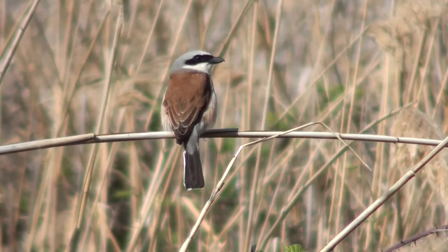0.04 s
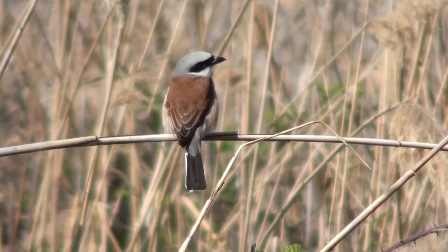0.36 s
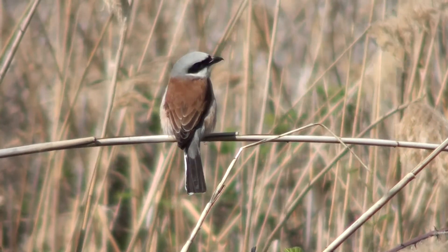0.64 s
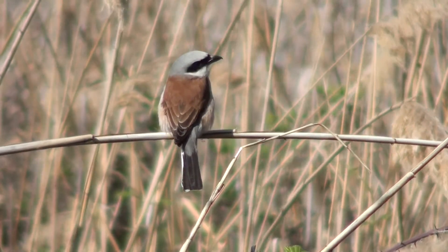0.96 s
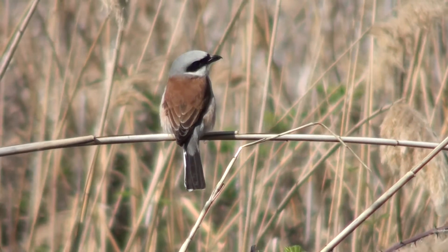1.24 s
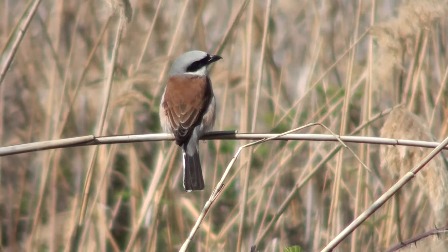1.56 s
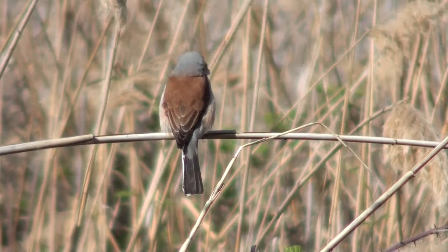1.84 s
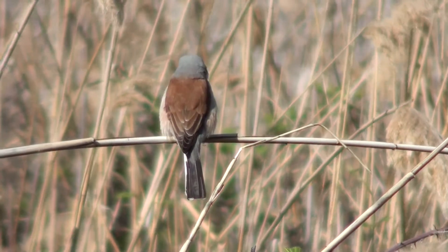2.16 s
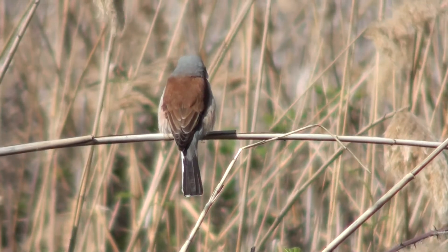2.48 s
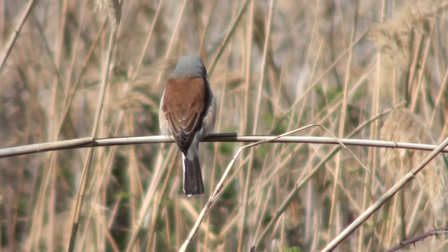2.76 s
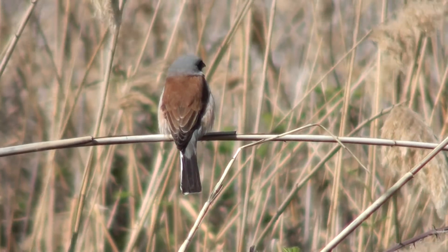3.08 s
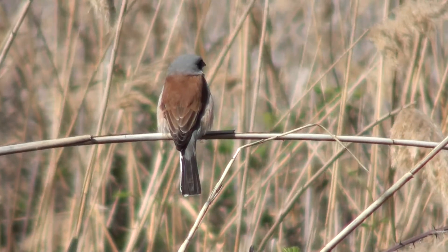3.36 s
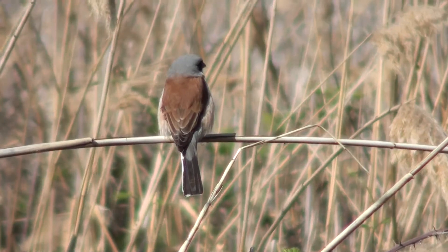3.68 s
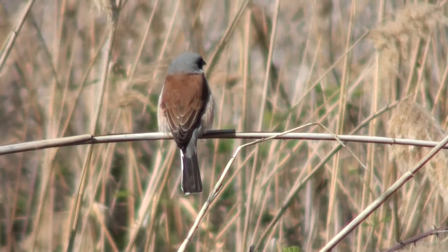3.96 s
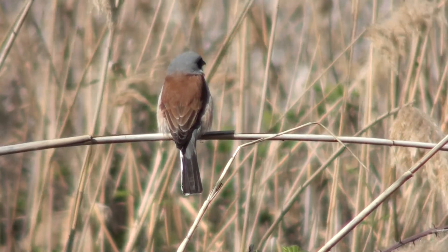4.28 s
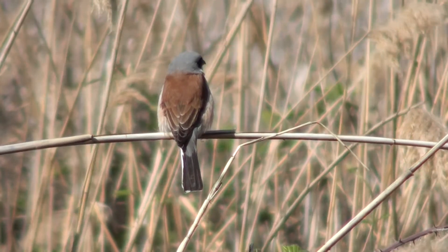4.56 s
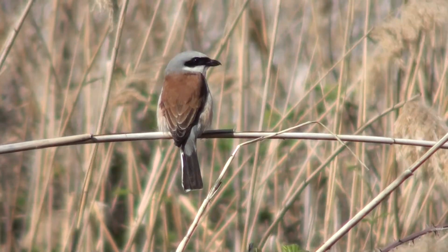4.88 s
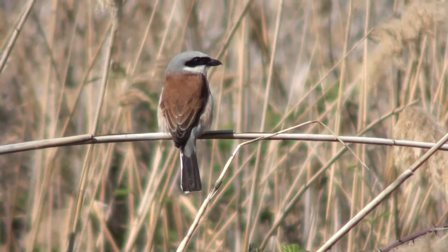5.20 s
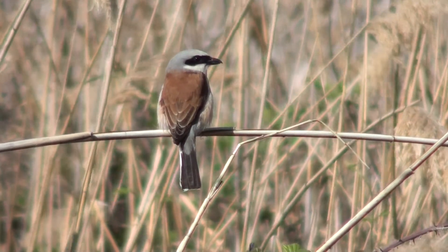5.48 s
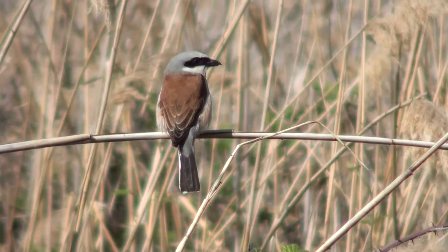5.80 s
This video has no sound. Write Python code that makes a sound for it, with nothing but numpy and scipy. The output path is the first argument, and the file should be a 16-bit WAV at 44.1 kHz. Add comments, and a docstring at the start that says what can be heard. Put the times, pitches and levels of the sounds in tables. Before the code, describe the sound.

Outdoors by calm reeds, over steady soft air and microphone hiss, a close warbler gives soft scratchy notes against distant rising chirps. Two clear whistles follow, then a louder run of stuttering rasps, then an even series of buzzy nasal cheeps, all a little to the left. Two soft knocks and a few dry stem ticks fall around the cheeps. Thin far whistles come and go, and two brief rasps finish.

```python
"""Small songbirds at the edge of a reedbed on a calm day, over quiet air and microphone hiss.
First a far bird sings low upslurs while a near warbler rasps softly, its syrinx flapping unevenly.
From 1.2 s come two long whistles and far hoarse calls; from 1.8 s, eight loud stuttering rasps.
A soft knock at 3.7 s precedes nine nasal cheeps, each a buzz plus a whistle; dry stems tick among them
and a second knock falls at 5.2 s. Two short rasps close. Slurs and thin whistles come and go."""
import sys
import numpy as np
from scipy import signal
from scipy.fft import rfft, irfft
from scipy.io import wavfile
from scipy.ndimage import uniform_filter1d, map_coordinates

SR = 44100
rng = np.random.default_rng(int(sys.argv[2]) if len(sys.argv) > 2 else 0)


def transcribe(u):
    """Save the signal u as a 16-bit wav file named by the first command-line argument.

    u: samples, shape (n,) or (channels, n), limited to [-1, 1]; the rate is SR.
    q: integer samples, one column per channel.
    """
    v = np.clip(np.atleast_2d(u).T, -1, 1)
    q = np.round(v * 32767).astype(np.int16)
    wavfile.write(sys.argv[1], SR, q)


N = 261954

# Warbler's rasping notes. Each row: time in seconds, time stretch factor, level in dB, rhythm name.
RASPS = [(.352, 0.97, -42, "soft"), (.517, 1.04, -41, "soft"), (.764, 1.06, -39.5, "soft"),
         (.934, 1, -42, "soft"), (1.828, 0.97, -37.5, "loud"), (2.033, 0.98, -36, "loud"),
         (2.311, 0.98, -35, "loud"), (2.510, 1.03, -35, "loud"), (2.780, 0.98, -35.5, "loud"),
         (2.996, .99, -36, "loud"), (3.275, 0.98, -36.5, "loud"), (3.485, 1.056, -36.5, "loud"),
         (5.626, 0.95, -40, "short"), (5.823, 0.96, -41, "short")]
# Bursts of each rhythm. Each row: offset in seconds, length in seconds, early pitch in Hz,
# late pitch in Hz, relative level in dB.
RHYTHM_BURSTS = { "soft": [(-.029, .015, 3100, 3290, -4.5), (0, 0.013, 2810, 2870, -3),
                 (.018, .0105, 2760, 2970, -2), (.032, 0.013, 2810, 2790, 0.5),
                 (.0465, .007, 2780, 2750, 1.5), (.056, 0.023, 2824, 2750, -0.5)],
                 "loud": [(-.025, .018, 2730, 3020, -11), (0, 0.024, 2560, 2800, 0),
                 (.023, 0.017, 3040, 3050, -1.5), (.047, .0158, 2680, 2770, -1),
                 (.0712, .0098, 2730, 2820, -1.5), (.0835, 0.028, 2703, 2650, 0)],
                 "short": [(0, .015, 2320, 2420, -0.5), (.022, 0.018, 2570, 3100, 1),
                 (.041, .021, 2930, 2580, 1)]}
# Cheeps. Each row: peak time in seconds, whistle pitch in Hz, sweep exponent, buzz fundamental in Hz,
# level in dB.
CHEEP_NOTES = [(3.808, 3600, 1.37, 1454, -36.5), (3.984, 3560, 1.3, 1478, -36),
               (4.162, 3640, .95, 1458, -35.5), (4.349, 3640, 1.4, 1475, -34),
               (4.538, 3610, 0.53, 1472, -35), (4.737, 3630, 0.7, 1504, -36),
               (4.943, 3630, 0.97, 1449, -36.5), (5.162, 3540, 1.27, 1438, -35.5),
               (5.369, 3490, 1.8, 1436, -36)]
# A cheep's whistle and buzz. Each row: offset from the peak in seconds, pitch ratio, gain in dB.
CHEEP_WHISTLE_CONTOUR = [(-.02, .88, -35), (-.011, .905, -7), (-.005, .945, -2), (0, 1.0, 0),
                         (.006, 1.04, -2), (.014, 1.045, -9), (.026, .985, -18), (.036, .97, -35)]
CHEEP_BUZZ_CONTOUR = [(-.045, 1.01, -22), (-.027, 1.0, -5), (-.016, .975, 1), (-.011, .93, -6),
                      (-.003, .97, -25), (.008, 1.02, -3), (.025, .998, 0), (.052, .978, -2),
                      (.063, .975, -9), (.074, .975, -24)]
# Buzz spectrum. Each row: harmonic number, gain in dB.
BUZZ_HARMONICS = [(2, -1.5), (3, 1.5), (4, -14.5), (5, -19), (6, -22)]
# Long whistles, one list per note. Each row: time in seconds, pitch in Hz, level in dB.
LONG_WHISTLE_CONTOURS = [
    [(1.219, 2960, -44), (1.225, 3030, -37), (1.231, 3280, -41), (1.241, 3190, -37), (1.269, 3000, -38.5),
     (1.341, 2890, -40.5), (1.352, 2902, -58)],
    [(1.498, 3290, -31), (1.508, 3110, -35), (1.624, 2969, -39.5), (1.638, 2871, -40.5), (1.648, 2660, -60)],
]
# Warbler's direction. Each row: frequency in Hz, left minus right in dB.
WARBLER_PAN = [(1500, 3), (2400, 3.9), (3100, 4.0), (3700, 2.6), (4400, .5), (9000, .8)]
# Slurs and hoarse calls. Each row: start in seconds, length in seconds, start pitch in Hz,
# end pitch in Hz, level in dB.
SLUR_NOTES = [(-.004, 0.03, 3500, 4640, -44.5), (0.139, .026, 4850, 3530, -50.5),
              (.207, 0.056, 4500, 4750, -54.5), (.208, .028, 6000, 6300, -61),
              (1.102, 0.019, 2880, 2520, -49), (1.196, 0.031, 2980, 3540, -42),
              (1.458, 0.039, 3000, 3620, -42.5), (1.474, 0.044, 3000, 2460, -45.5),
              (1.685, 0.034, 2330, 2910, -49.5), (4.791, 0.023, 2650, 2510, -49),
              (4.891, 0.053, 2420, 2570, -51), (5.019, 0.019, 3900, 2600, -50),
              (5.299, 0.014, 4050, 2350, -44), (5.505, .018, 3050, 2400, -55)]
HOARSE_NOTES = [(1.177, 0.084, 4110, 3800, -49), (1.257, .2, 2000, 2154, -50.5),
                (1.423, 0.077, 3450, 3830, -51.5), (1.424, 0.072, 7750, 6820, -60.5),
                (1.461, 0.17, 4170, 4230, -49), (1.763, 0.042, 4450, 3950, -51),
                (1.856, 0.04, 4250, 3920, -48), (1.961, .058, 3530, 4120, -47.5),
                (2.148, 0.044, 4020, 4100, -49.5), (2.156, .12, 2050, 1865, -54.5),
                (2.241, 0.042, 4250, 3855, -46.5), (2.497, 0.025, 4040, 4270, -46.5)]
# Low bird's phrases. Each row: start in seconds, level in dB.
UPSLUR_PHRASES = [(0.051, -52.5), (.248, -51), (0.455, -49.5), (.659, -49), (.865, -48), (1.074, -47),
                  (1.276, -51.5)]
# One upslur. Each row: offset in seconds, pitch in Hz, gain in dB.
UPSLUR_CONTOUR = [(0, 1740, -11), (.005, 1730, -2.5), (.012, 1815, 1.5), (.02, 2090, -11),
                  (.027, 2060, -1.5), (.033, 2110, -25)]
# Far whistles. Each row: start in seconds, length in seconds, mid pitch in Hz, level in dB,
# left minus right in dB.
THIN_NOTES = [(.008, 0.037, 5300, -54.5, 6), (.03, .11, 3450, -58.5, 2), (.072, .08, 5200, -56.5, 5),
              (0.261, 0.031, 3430, -56.5, 1), (0.592, 0.063, 2560, -55, -1), (.675, 0.1, 3500, -57, 3),
              (0.933, 0.089, 4070, -49.5, 1), (3.688, 0.048, 3280, -55, 0), (5.043, .095, 3010, -49, -3.5),
              (5.262, 0.022, 2980, -49, 7), (5.425, 0.093, 3000, -51.5, -2)]
# Knocks. Each row: start in seconds, level in dB, resonance in Hz, its T60 in seconds, thud gain in dB.
SOFT_KNOCKS = [(3.689, -39, 530, 0.042, -24.5), (5.246, -45, 636, 0.14, -6.5)]
# Dry stems. Each row: start in seconds, level in dB, T60 in seconds.
STEM_TICKS = [(3.811, -42, 0.011), (3.821, -45, 0.013), (4.984, -51, .015), (5.337, -44.5, 0.015),
              (5.413, -51.5, 0.025), (5.528, -43, 0.034)]
# Air and hiss. Each row: frequency in Hz, relative spectral density in dB.
AIR_SPECTRUM = [(15, -49), (30, -9.5), (60, -7.5), (230, -4.5), (420, -6), (800, -8.5), (1900, -8.5),
                (2600, -4), (3500, -4.5), (4900, -12), (7500, -13.5), (11000, -15), (15500, -15.5)]
# Stereo likeness of the air. Each row: frequency in Hz, left-right correlation.
AIR_CORRELATION = [(40, 0.96), (90, 0.9), (180, 0.76), (350, 0.22), (700, 0.013), (1400, 0.075),
                   (3000, 0.88), (6000, 0.73), (12000, 1)]
# Wind on the microphone. Each row: centre in seconds, length in seconds, level in dB.
WIND_PUFFS = [(0.139, .14, -63.5), (1.097, .15, -62), (2.901, 0.18, -61), (3.303, .22, -62),
              (4.364, 0.086, -59.5)]
# Faint whine. Each row: frequency in Hz, level in dB.
WHINE_TONES = [(6887, -82), (6912, -82)]


def from_db(db):
    return 10 ** (np.asarray(db) / 20)


def unit_rms(x):
    return x / np.sqrt(np.mean(x ** 2) + 1e-20)


def phase_of(hz):
    return 2 * np.pi * np.cumsum(hz) / SR


def at_hz(points, hz):
    """Interpolate on a log-frequency axis."""
    knots_hz, values = np.transpose(points)
    return np.interp(np.log(hz), np.log(knots_hz), values)


def band(x, low_hz, high_hz, order=2):
    """Butterworth band-pass."""
    return signal.sosfilt(signal.butter(order, [low_hz, high_hz], "band", fs=SR, output="sos"), x)


def wander(size, rate_hz):
    """Random drift of spread about 1, linear between rate_hz points a second."""
    position = np.arange(size) * rate_hz / SR
    return map_coordinates(rng.standard_normal(size // 4 + 4), [position + 1], order=1) * np.sqrt(3 / 2)


def contour(rows):
    """Per-sample pitch and gain from rows of seconds, pitch, dB."""
    times_s, pitch, db = np.transpose(rows)
    t = np.arange(times_s[0], times_s[-1], 1 / SR)
    return np.interp(t, times_s, pitch), from_db(np.interp(t, times_s, db))


def add(out, start_s, sound, pan_db=0):
    """Mix in a mono sound; positive pan_db is left."""
    start = round(start_s * SR)
    sound = sound[max(-start, 0):N - start]
    start = max(start, 0)
    out[:, start:start + len(sound)] += from_db([[pan_db / 2], [-pan_db / 2]]) * sound


def rasp_burst(length_s, early_hz, late_hz, flap_hz=620, jitter=0.45, ring_s=0.00045,
               upper_hz=3880, upper_db=-14.5, upper_ring_s=0.0011,
               pure_from_s=0.0151, pure_fade_s=0.0068, pure_db=4, sag_per_s=9):
    """The syrinx flaps unevenly; each flap rings the throat at the pitch and a weaker upper resonance."""
    t = np.arange(int(length_s * SR)) / SR
    flap_s = np.cumsum(np.exp(jitter * rng.standard_normal(60))) / flap_hz
    flap_s -= flap_s[0]
    flap_s = flap_s[flap_s < t[-1]]
    flaps = np.zeros(len(t))
    flaps[(flap_s * SR).astype(int)] = from_db(rng.normal(0, 1.9, len(flap_s)))

    def resonance(phase, decay_s):
        carrier = np.exp(1j * phase)
        ring = signal.fftconvolve(flaps / carrier, t * np.exp(-t / decay_s))[:len(t)] * carrier
        return ring / np.std(ring.real)
    # a long falling burst stops flapping and sinks as a pure tone
    sinking_s = np.maximum(t - pure_from_s, 0) * (late_hz < early_hz)
    pure_share = np.minimum(sinking_s / pure_fade_s, 1)
    pitch_hz = np.interp(t, [length_s / 4, length_s * 3 / 4], [early_hz, late_hz])
    phase = phase_of(pitch_hz * (1 - sag_per_s * sinking_s))
    upper = from_db(upper_db) * resonance(2 * np.pi * upper_hz * t, upper_ring_s)
    throat = resonance(phase, ring_s) + upper
    power = uniform_filter1d(np.abs(throat) ** 2, size=100)
    evened = unit_rms(throat.real / (power + 0.01) ** 0.34)   # steady air pressure evens the flaps
    voice = (1 - pure_share) * evened + pure_share * from_db(pure_db) * np.sin(phase)
    swell = np.sin(np.pi * (t / length_s) ** 0.68) ** 0.51   # quick rise, slower fall
    return unit_rms(band(swell * voice, 2266, 4930, order=3))


def rasps(overtone_db=-27, scatter_db=0.6, pitch_scatter=0.011):
    """Each note stutters through its rhythm of bursts, with a faint third harmonic."""
    out = np.zeros((2, N))
    for note_s, stretch, note_db, rhythm in RASPS:
        for offset_s, length_s, early_hz, late_hz, burst_db in RHYTHM_BURSTS[rhythm]:
            tuning = 1 + pitch_scatter * rng.standard_normal()
            burst = rasp_burst(length_s * stretch, early_hz * tuning, late_hz * tuning)
            overtone = from_db(overtone_db) * unit_rms(band(burst ** 3, 7400, 13300))
            gain = from_db(note_db + burst_db + scatter_db * rng.standard_normal())
            add(out, note_s + offset_s * stretch, gain * (burst + overtone))
    return out


def nasal_buzz(fundamental_hz, ragged_at_s=-0.018, ragged_width_s=0.0136, flicker_db=3):
    """One side of the syrinx buzzes, turning ragged as the other side sets in."""
    ratio, gain = contour(CHEEP_BUZZ_CONTOUR)
    size = len(ratio)
    from_peak_s = np.arange(size) / SR + CHEEP_BUZZ_CONTOUR[0][0]
    ragged = np.exp(-((from_peak_s - ragged_at_s) / ragged_width_s) ** 2)
    jitter = 0.021 + 0.042 * ragged * rng.uniform(0.7, 1.67)
    tuning = 1 + 0.0054 * wander(size, 46.7) + jitter * wander(size, 1800)
    phase = phase_of(fundamental_hz * ratio * tuning)
    buzz = sum(from_db(db + flicker_db * wander(size, 70)) * np.sin(k * phase)
               for k, db in BUZZ_HARMONICS)
    return np.sqrt(2) * gain * buzz


def cheeps(catch_lead_s=0.02, catch_db=-14, buzz_db=-13, waver=0.015, coupling=0.1):
    """One side of the syrinx catches hoarsely, then whistles upward, shaken by the other side's buzz."""
    out = np.zeros((2, N))
    ratio, gain = contour(CHEEP_WHISTLE_CONTOUR)
    size = len(ratio)
    for peak_s, whistle_hz, sweep, buzz_hz, db in CHEEP_NOTES:
        catch = glide(length_s=0.018, start_hz=4230, end_hz=3706, rough=0.51)
        add(out, peak_s - catch_lead_s, from_db(db + catch_db) * catch)
        rise_hz = whistle_hz * ratio ** sweep * (1 + waver * wander(size, 72))
        shake = 1 + coupling * np.sin(phase_of(np.full(size, buzz_hz)))
        rise = gain * shake * whistle(rise_hz, rough=0.26)
        add(out, peak_s + CHEEP_WHISTLE_CONTOUR[0][0], from_db(db) * rise)
        add(out, peak_s + CHEEP_BUZZ_CONTOUR[0][0], from_db(db + buzz_db) * nasal_buzz(buzz_hz))
    return out


def whistle(pitch_hz, rough, spread_hz=130, rough_spread_hz=330):
    """Near sine, RMS 1; rough (0 to 1) turns part of it into a widening noise band around the pitch."""
    settle = SR // 100
    noise = [1, 1j] @ rng.standard_normal((2, len(pitch_hz) + settle))
    lowpass = signal.butter(2, spread_hz + rough * rough_spread_hz, fs=SR, output="sos")
    shake = signal.sosfilt(lowpass, noise)[settle:]
    amplitude = np.sqrt(1 - rough ** 2) + rough * shake / np.std(shake)
    return unit_rms((amplitude * np.exp(1j * phase_of(pitch_hz))).real)


def long_whistles(rough=0.2, waver=0.01, flicker_db=0.1):
    """Two slowly sinking, slightly wavering notes."""
    out = np.zeros((2, N))
    for rows in LONG_WHISTLE_CONTOURS:
        pitch_hz, gain = contour(rows)
        size = len(pitch_hz)
        gain *= from_db(-flicker_db * wander(size, 90)) * signal.windows.tukey(size, 0.06)
        pitch_hz *= 1 + waver * wander(size, 72.6)
        add(out, rows[0][0], gain * whistle(pitch_hz, rough))
    return out


def from_the_left(x):
    """The warbler sits left; the level difference between the ears depends on frequency."""
    bin_hz = np.maximum(np.arange(N // 2 + 1) * SR / N, 1)
    pan_db = at_hz(WARBLER_PAN, bin_hz)
    return irfft(rfft(x) * from_db([pan_db / 2, -pan_db / 2]), N)


def glide(length_s, start_hz, end_hz, rough, flicker_db=1.5, waver=0.0066):
    """A wavering slide; its strength flickers on the way through the reeds."""
    size = int(length_s * SR)
    gain = from_db(flicker_db * wander(size, 153)) * signal.windows.tukey(size, 0.39)
    pitch_hz = np.linspace(start_hz, end_hz, size) * (1 + waver * wander(size, 79.6))
    return gain * whistle(pitch_hz, rough)


def slurs():
    """Quick slides up or down between the warbler's notes."""
    out = np.zeros((2, N))
    for start_s, length_s, start_hz, end_hz, db in SLUR_NOTES:
        add(out, start_s, from_db(db) * glide(length_s, start_hz, end_hz, rough=0.42), pan_db=4.5)
    return out


def hoarse_calls():
    """Scratchy notes from deeper in the reeds; pitch and strength shake."""
    out = np.zeros((2, N))
    for start_s, length_s, start_hz, end_hz, db in HOARSE_NOTES:
        call = glide(length_s, start_hz, end_hz, rough=0.92, flicker_db=2.5, waver=0.0245)
        add(out, start_s, from_db(db) * call)
    return out


def upslurs(repeat_s=0.037, repeat_db=-3, flick_at_s=0.154, flick_db=-2, rough=0.08, pan_db=-1.8):
    """A low rising note sung twice, then a high downward flick."""
    out = np.zeros((2, N))
    pitch_hz, gain = contour(UPSLUR_CONTOUR)
    for start_s, db in UPSLUR_PHRASES:
        add(out, start_s, from_db(db) * gain * whistle(pitch_hz, rough), pan_db)
        add(out, start_s + repeat_s, from_db(db + repeat_db) * gain * whistle(pitch_hz, rough), pan_db)
        flick = glide(length_s=0.014, start_hz=4930, end_hz=4160, rough=0.7)
        add(out, start_s + flick_at_s, from_db(db + flick_db) * flick, pan_db)
    return out


def thin_whistles(sag_per_s=0.59):
    """Far birds hold notes that sag slightly in pitch."""
    out = np.zeros((2, N))
    for start_s, length_s, mid_hz, db, pan_db in THIN_NOTES:
        sag = sag_per_s * length_s / 2
        note = glide(length_s, mid_hz * (1 + sag), mid_hz * (1 - sag), rough=0.15)
        add(out, start_s, from_db(db) * note, pan_db)
    return out


def knocks_and_ticks(ring_db=-1, clack_db=-8):
    """A knock is a hollow ring, a clack and a low thud; a stem tick is a tiny bright snap."""
    out = np.zeros((2, N))
    t = np.arange(SR // 2) / SR

    def burst(low_hz, high_hz, t60_s):
        return unit_rms(band(rng.standard_normal(len(t)), low_hz, high_hz)) * from_db(-60 * t / t60_s)
    for start_s, db, ring_hz, t60_s, thud_db in SOFT_KNOCKS:
        ring = from_db(ring_db - 60 * t / t60_s) * np.sin(2 * np.pi * ring_hz * t)
        clack = from_db(clack_db) * burst(440, 1600, t60_s=0.086)
        thud = from_db(thud_db) * burst(100, 740, t60_s=0.48)
        add(out, start_s, from_db(db) * (ring + clack + thud))
    for start_s, db, t60_s in STEM_TICKS:
        add(out, start_s, from_db(db) * burst(7800, 9700, t60_s))
    return out


def reed_scatter(x, t60_s=0.4, build_s=0.0041):
    """Countless stems scatter a smooth tail, different at each ear."""
    t = np.arange(SR * 3 // 5) / SR
    tail = rng.standard_normal((2, len(t))) * from_db(-60 * t / t60_s) * (1 - np.exp(-t / build_s))
    tail /= np.sqrt(np.sum(tail ** 2) / 2)
    return signal.fftconvolve(x, tail, axes=1)[:, :N]


def air(level_db=-53.5, sway_db=1.1, far_song_db=2.53):
    """Outdoor noise and hiss; the rumble sways and two bands shimmer like far birdsong."""
    bin_hz = np.maximum(np.arange(N // 2 + 1) * SR / N, 1)
    correlation = at_hz(AIR_CORRELATION, bin_hz)
    width = np.sqrt((1 - correlation) / (1 + correlation))
    mid_bins, side_bins = rfft(rng.standard_normal((2, N))) * from_db(at_hz(AIR_SPECTRUM, bin_hz))
    mid, side = irfft(mid_bins, N), irfft(side_bins * width, N)
    noise = (mid + side * [[1], [-1]]) / np.std(mid)
    for low_hz, high_hz, swing_db, rate_hz in [
            (15, 280, sway_db, 17), (2160, 3300, far_song_db, 30), (3050, 3300, far_song_db, 62)]:
        part = irfft(rfft(noise) * ((bin_hz >= low_hz) & (bin_hz < high_hz)), N)
        noise += part * (from_db(swing_db * wander(N, rate_hz)) - 1)
    return from_db(level_db) * noise


def wind_puffs():
    """Low swells of air on the microphone, alike in both channels."""
    out = np.zeros((2, N))
    for centre_s, length_s, db in WIND_PUFFS:
        size = int(length_s * SR)
        rumble = unit_rms(band(rng.standard_normal(SR // 2), 40, 90)[-size:])
        add(out, centre_s - length_s / 2, from_db(db) * np.hanning(size) * rumble)
    return out


def whine(drift_hz=4):
    """Two very faint, close tones beat."""
    return sum(from_db(db) * unit_rms(np.sin(phase_of(hz + drift_hz * wander(N, 14))))
               for hz, db in WHINE_TONES)


def scene(rasp_wet_db=-22, song_wet_db=-13.5, far_wet_db=-8):
    """The further a source, the more of it arrives by way of the reeds."""
    rasping = from_the_left(rasps())
    song = from_the_left(cheeps() + long_whistles()) + slurs()
    far = thin_whistles() + hoarse_calls() + upslurs() + knocks_and_ticks()
    send = from_db(rasp_wet_db) * rasping + from_db(song_wet_db) * song + from_db(far_wet_db) * far
    return rasping + song + far + reed_scatter(send) + air() + wind_puffs() + whine()


def record(dry, cutoff_hz=15900):
    """Steep low-pass."""
    return signal.sosfilt(signal.ellip(10, 0.1, 70, cutoff_hz, fs=SR, output="sos"), dry)


dry = scene()
out = record(dry)
transcribe(out)
```